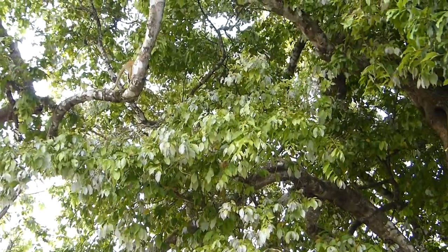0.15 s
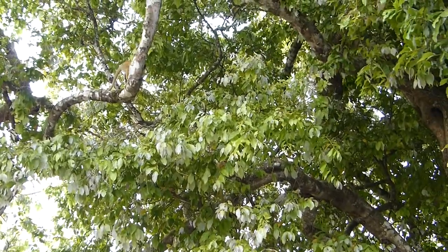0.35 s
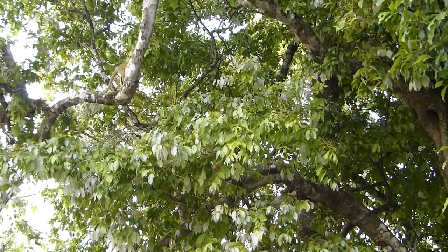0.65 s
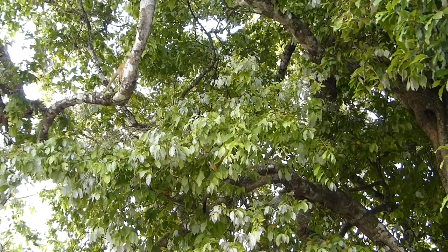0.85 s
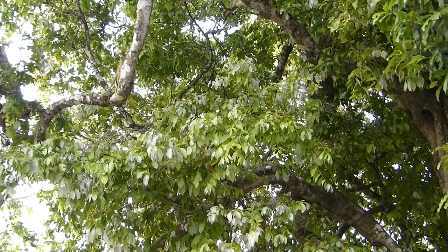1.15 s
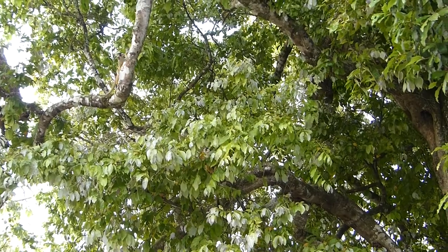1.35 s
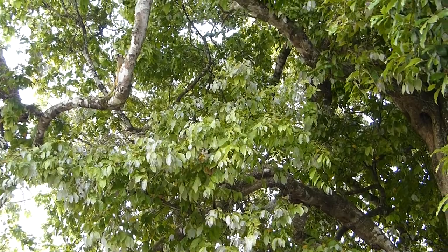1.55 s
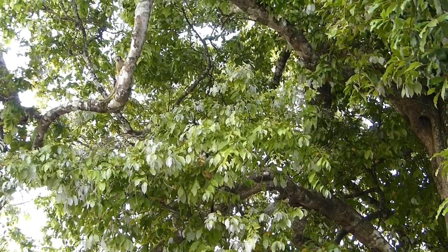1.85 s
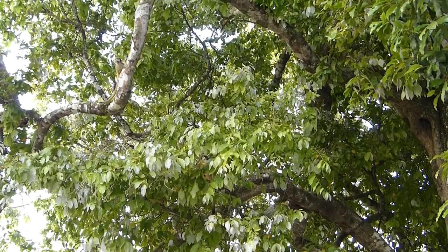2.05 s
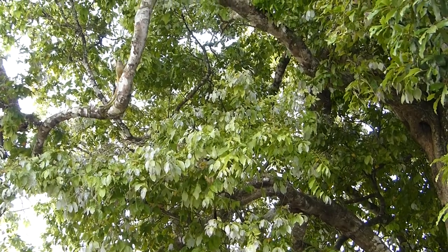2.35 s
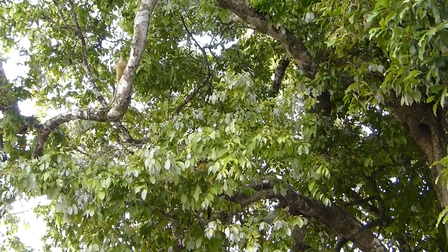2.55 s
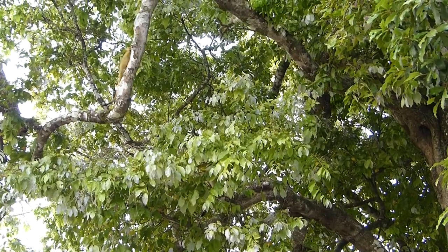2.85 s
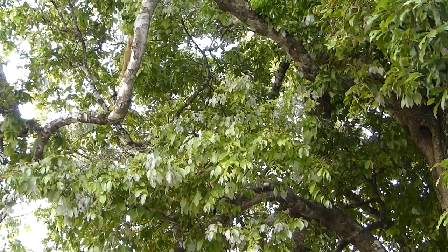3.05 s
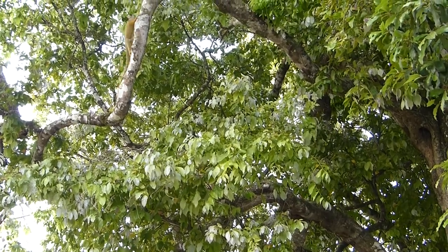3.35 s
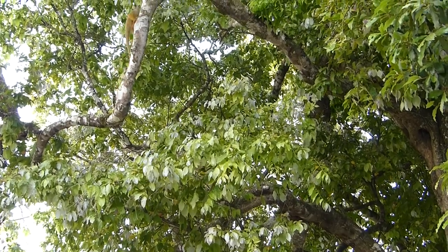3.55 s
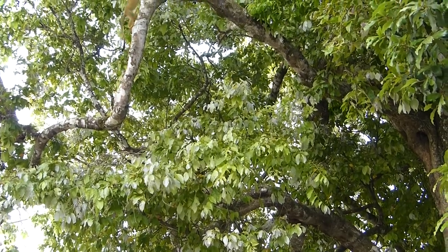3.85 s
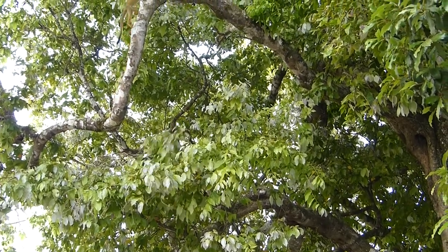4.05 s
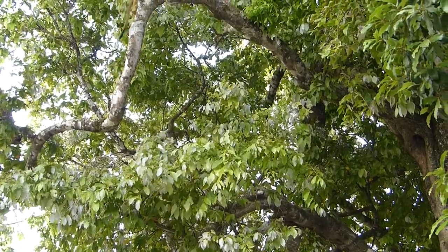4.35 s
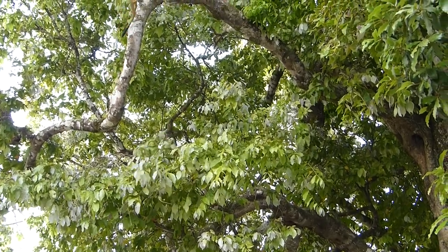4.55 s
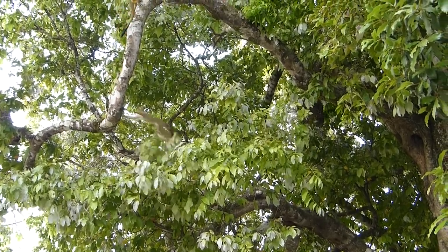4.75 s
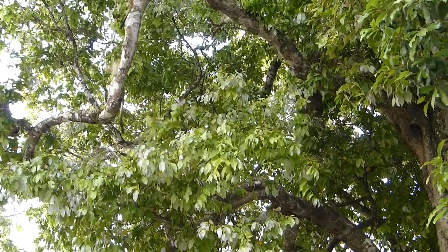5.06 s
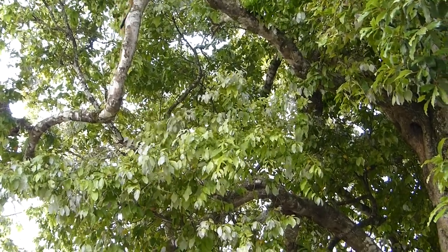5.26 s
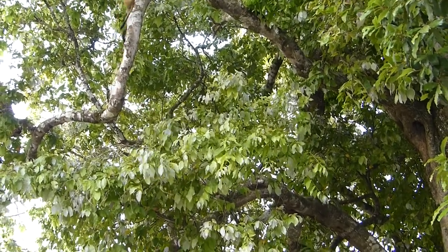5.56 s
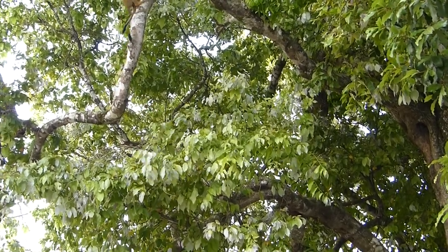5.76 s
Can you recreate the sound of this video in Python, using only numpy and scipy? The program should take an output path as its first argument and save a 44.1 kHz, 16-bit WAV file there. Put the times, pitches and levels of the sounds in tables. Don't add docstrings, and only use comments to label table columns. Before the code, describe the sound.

Small monkeys give bright, high peeps and chirps in a leafy tree, growing to a loud squealing flurry with branch thuds and leaf rustles.

```python
import sys
import numpy as np
from scipy import signal
from scipy.io import wavfile
from scipy.ndimage import uniform_filter1d

SR = 44100
rng = np.random.default_rng(int(sys.argv[2]) if len(sys.argv) > 2 else 0)


def linear_from_db(decibels):
    return 10 ** (np.asarray(decibels, float) / 20)


def unload_wav(signal):
    wavfile.write(
        sys.argv[1],
        SR,
        np.round(np.clip(np.atleast_2d(signal).T, -1, 1) * 32767).astype(np.int16),
    )


N = 259749


# share_of_hold, share_of_rise, level_db
PEEP_HOLD = [(0, 0.025, -1.9), (.5, 0.36, -1.5), (0.998, 0.96, 0.2)]
# share_of_flick, share_of_rise, level_db
PEEP_FLICK = [(.5, 0.46, -0.5), (1, 1, -9)]


def peep(s, hold_s, start_hz, held_hz, level_db):
    top_hz = 11324 + 78 * (level_db + 22)
    flick_hz = top_hz - held_hz
    flick_s = flick_hz / 127000
    hold_rise_hz = held_hz - start_hz
    onset_db = -0.1369 * min(hold_rise_hz / hold_s / 1000, 27)
    hold = [(s + u * hold_s, start_hz + rise * hold_rise_hz, level_db + db + onset_db * (1 - u))
            for u, rise, db in PEEP_HOLD]
    flick = [(s + hold_s + u * flick_s, held_hz + rise * flick_hz, level_db + db)
             for u, rise, db in PEEP_FLICK]
    return hold + flick


# pitch_hz, octave_db (over the pitch)
OCTAVE = [(5100, 11), (5700, -9), (6400, -16), (7100, -25), (7700, -23.5), (8300, -40.5)]


def with_octave(rows):
    s, hz, level_db = np.transpose(list(rows))
    progress = (s - s[0]) / (s[-1] - s[0])
    climb_khz_s = np.maximum(np.gradient(hz, s), 0) / 1000 * progress
    return np.transpose([s, hz, level_db, at_hz(OCTAVE, hz) - 0.12 * climb_khz_s])


def sweep(s, length_s, start_hz, top_hz, peak_db, levels):
    u = np.linspace(0, 1, num=24)
    straight_share, bend_power = 0.4, 4.6
    rise = straight_share * u + (1 - straight_share) * u ** bend_power
    hz = start_hz + (top_hz - start_hz) * rise
    level_db = peak_db + np.interp(u, *np.transpose(levels))
    return with_octave(zip(s + length_s * u, hz, level_db))


def whistle(rows):
    s, hz, level_db, *more = np.transpose(rows)
    t = np.arange(s[0], s[-1], 1 / SR)
    hz = uniform_filter1d(np.interp(t, s, hz), size=330, mode="nearest")
    turn = 2 * np.pi * np.cumsum(hz) / SR
    tone = np.sin(turn)
    for octave_db in more:
        octave = linear_from_db(np.interp(t, s, octave_db))
        tone += octave * np.sin(2 * turn) * (hz < 9000)
        third = octave * linear_from_db(-25.5)
        tone += third * np.sin(3 * turn) * np.clip((5150 - hz) / 200, 0, 1)
    flutter = rms_one(np.convolve(rng.standard_normal(SR // 2), np.hanning(260)))[260:260 + len(t)]
    tone *= 1 + 0.33 * np.clip((5300 - hz) / 200, 0, 1) * flutter
    attack_s, release_s = 0.0048, 0.0028
    edge = np.clip(np.minimum((t - s[0]) / attack_s, (s[-1] - t) / release_s), 0, 1)
    return np.sqrt(2) * linear_from_db(np.interp(t, s, level_db)) * tone * np.sin(edge * np.pi / 2) ** 2


def rasp(tone, share):
    low = signal.butter(4, 260, fs=SR, output="sos")
    flutter = signal.sosfilt(low, rng.standard_normal(len(tone)))
    return tone * (np.sqrt(1 - share ** 2) + share * rms_one(flutter))


# pitch_hz, t60_s
TREES_T60 = [(2500, 0.29), (5000, 0.44), (8000, 0.41), (11000, 0.29), (15000, .3)]


def trees(hz, hidden_db):
    t = np.arange(SR // 2) / SR
    echo_s = 0.013 + 0.011 * rng.uniform(-2.25, 1)
    glints = linear_from_db(2.8 * np.minimum(rng.exponential(1, len(t)), 3))
    grains = rng.standard_normal((2, len(t))) * glints
    crown = np.exp(-.5 * ((t - echo_s) / 0.011) ** 2)
    scatter = np.clip((t - .004) / 0.0075, 0, 1) * linear_from_db(-60 * t / at_hz(TREES_T60, hz))
    near = np.exp(-t / 0.0016)
    shape = linear_from_db(-13.5) * crown / np.linalg.norm(crown)
    shape += linear_from_db(-4) * scatter / np.linalg.norm(scatter)
    shape += linear_from_db(-9) * near / np.linalg.norm(near)
    path = pair(*rms_one(grains), alike=0.79) * np.sqrt(2) * linear_from_db(hidden_db) * shape
    shade_hz, shade_gain = 12360, linear_from_db(-17.5)
    direct = 1. * (t == 0)
    dull = signal.sosfilt(signal.butter(2, shade_hz, fs=SR, output="sos"), direct + 1e-18)
    return path + shade_gain * direct + (1 - shade_gain) * dull


# start_s, hold_s, start_hz, held_hz, level_db
PEEPS = [
    (0.522, 0.048, 7870, 9160, -31.5),
    (1.236, 0.048, 8370, 9450, -22),
    (1.493, 0.059, 8325, 9220, -24),
    (1.749, 0.06, 8250, 8910, -22.5),
    (2.556, 0.046, 8540, 9340, -23.5),
    (2.806, 0.055, 7970, 9300, -28.5),
    (3.3, 0.063, 8610, 9300, -32),
]
# start_s, length_s, start_hz, top_hz, peak_db
SWEEPS = [
    (1.211, .022, 6370, 8480, -56),
    (2.522, 0.04, 5820, 7070, -54),
    (3.286, 0.0264, 6120, 7360, -50.5),
    (3.836, 0.015, 7780, 9300, -36.5),
    (4.589, 0.05, 6910, 12200, -21.5),
    (5.176, 0.077, 5510, 13420, -12.5),
    (5.385, 0.071, 5090, 11140, -18.5),
    (5.652, 0.021, 7900, 9600, -31),
]
# share_of_length, level_db
SWEEP_LEVEL = [(0, -13.5), (.35, -7.5), (.77, 0), (.88, -7), (1, -11)]
SWEEP_OCTAVE_DB = [-20, -20, -20, -11, 2, 5, 3, -7.5]
# start_s, length_s, start_hz, top_hz, peak_db
SNAPS = [
    (.906, .026, 7640, 10220, -31.5),
    (4.798, .042, 7010, 12870, -18),
]
# share_of_length, level_db
SNAP_LEVEL = [(0, -3), (.37, -4), (.7, -1), (1, -7.5)]
SNAP_OCTAVE_DB = [-20, 0]
# time_s, pitch_hz, level_db
TWITTERS = [
    [(3.508, 5800, -43), (3.516, 6710, -33.5), (3.535, 8160, -25), (3.57, 8640, -28.5),
     (3.592, 8900, -28.5), (3.612, 9170, -27.5), (3.622, 9800, -31), (3.631, 10540, -36)],
    [(4.0, 8520, -24), (4.04, 9085, -28.5), (4.08, 9314, -27.5), (4.125, 9150, -34), (4.133, 9470, -21.5),
     (4.139, 11030, -25.5), (4.146, 11200, -34)],
    [(4.249, 7720, -31), (4.262, 8500, -29.5), (4.285, 9020, -26.5), (4.33, 9345, -25), (4.37, 9040, -24.5),
     (4.41, 7790, -24), (4.445, 6230, -23), (4.475, 5893, -21.5), (4.49, 7410, -23.5), (4.503, 9220, -26)],
    [(4.973, 6610, -24), (5.0, 7420, -26), (5.02, 8380, -23), (5.043, 12000, -31.5)],
    [(5.425, 8970, -34), (5.48, 9200, -37), (5.52, 9460, -37.5), (5.54, 9780, -34.5), (5.555, 11740, -37.5)],
    [(5.672, 8980, -23), (5.71, 9110, -25), (5.76, 9520, -25.5), (5.79, 9400, -19.5), (5.82, 8120, -19),
     (5.845, 6910, -22.5), (5.853, 7000, -20), (5.874, 10390, -19.5)],
]
TWITTER_OCTAVE_DB = [8, -6, -0.5, -1.5, -3, 2.5]
# time_s, pitch_hz, level_db, octave_db (over the pitch)
SQUEAKS = [
    [(1.702, 4430, -49, -40), (1.712, 5000, -46.5, -40), (1.72, 5370, -47.5, -40), (1.73, 5460, -62, -40)],
    [(4.657, 5000, -29, -12), (4.672, 4638, -28.5, 0.5), (4.7, 4484, -28, 4), (4.72, 4743, -23.5, -8),
     (4.732, 4970, -20.5, -12), (4.738, 5800, -29, -46), (4.746, 7500, -27.5, -45), (4.754, 8350, -26, -45)],
    [(4.955, 2533, -46.5, 16), (4.97, 2468, -43, 4.5), (5.015, 2454, -45, -8)],
    [(4.996, 4000, -39, -24), (5.01, 4130, -41, -27), (5.045, 4230, -53, -14)],
    [(5.003, 4500, -33, -28), (5.025, 4730, -26, -30), (5.05, 4900, -29.5, -30), (5.09, 4900, -43, -30)],
    [(5.205, 5100, -42, 8), (5.222, 5080, -38, -2), (5.233, 5116, -31, -28), (5.262, 5150, -32, -30)],
]
SQUEAK_RASP = [.2, 0, 0, .3, .5, .35]
HIDDEN_DB = [
    [-2, -4.5, -3.5, -4, -4.5, 1, 2],
    [6.5, 6, 7, 1.5, 0.6, -6.5, -2.5, 1.5],
    [1.1, -2],
    [0, -1.4, .6, 2.5, 6.5, -1.5],
    [2, -0.3, -8, 0, 2, -1],
]


def monkeys():
    calls = [peep(*row) for row in PEEPS]
    calls += [sweep(*row, SWEEP_LEVEL) + [0, 0, 0, db] for row, db in zip(SWEEPS, SWEEP_OCTAVE_DB)]
    calls += [sweep(*row, SNAP_LEVEL) + [0, 0, 0, db] for row, db in zip(SNAPS, SNAP_OCTAVE_DB)]
    calls += [with_octave(rows) + [0, 0, 0, db] for rows, db in zip(TWITTERS, TWITTER_OCTAVE_DB)]
    rasps = [0] * len(calls) + list(SQUEAK_RASP)
    out = np.zeros((2, N + SR))
    for rows, share, hidden_db in zip(calls + list(SQUEAKS), rasps, np.concatenate(HIDDEN_DB)):
        voice = rasp(whistle(rows), share)
        mean_hz = np.mean(rows, axis=0)[1]
        heard = signal.fftconvolve(voice[None], trees(mean_hz, hidden_db), axes=1)
        at = int(rows[0][0] * SR)
        out[:, at:at + heard.shape[1]] += heard
    return linear_from_db(-1.0) * out[:, :N]


# time_s, centre_hz, level_db
SCREECH = [(4.95, 5950, -65), (4.965, 5985, -35), (5.0, 5535, -30.5), (5.05, 5640, -26), (5.1, 5900, -37.5),
           (5.17, 5970, -44), (5.25, 5800, -72)]


def screech():
    t = np.arange(N) / SR
    hz, level_db = in_time(SCREECH)
    sounds = (t > SCREECH[0][0]) & (t < SCREECH[-1][0])
    return sounds * linear_from_db(level_db) * narrow_noise(hz, width_hz=1500)


# time_s, wood_db, leaves_db, limb_db
SHAKES = [(.43, -74, -71, -53), (1.0, -57.5, -88, -59), (1.33, -60, -68, -72), (1.44, -58.5, -87, -70),
          (1.64, -54.5, -66, -85), (1.97, -60, -67, -64), (2.53, -62, -65, -57), (2.74, -60, -83, -76),
          (3.46, -60, -61.5, -53.5), (3.8, -70, -70, -48), (3.87, -66, -89, -58), (3.99, -59, -72, -52),
          (4.07, -54, -81, -69), (4.28, -56, -57.5, -45), (4.36, -52, -62, -65), (4.429, -57, -64.5, -44.5),
          (4.79, -50, -68, -42), (4.83, -49.5, -52.5, -60), (4.908, -49.5, -49.5, -44.5),
          (5.001, -70, -47.5, -75), (5.06, -42.5, -58, -40.5), (5.1, -44.5, -54.5, -42.5),
          (5.38, -50.5, -77, -76), (5.82, -75, -78, -60)]


def shakes(column):
    t = np.arange(0, N + 64, 64) / SR
    power = 0
    for row in SHAKES:
        rise_db, fall_db = 213 * (row[0] - t), 144 * (t - row[0])
        power = power + linear_from_db(row[column] - np.maximum(rise_db, fall_db)) ** 2
    return np.interp(np.arange(N) / SR, t, np.sqrt(power))


# time_s, wood_db, leaves_db, t60_s
LANDINGS = [
    (1.93, -56, -59, 0.26),
    (2.45, -55, -62, 0.35),
    (2.904, -50, -53, 0.16),
    (4.79, -71, -76, .3),
    (4.957, -62, -47, 0.51),
    (5.031, -39, -60, 0.52),
]


def landings(column):
    t = np.arange(N) / SR
    return sum((t > row[0]) * linear_from_db(row[column] - 60 * np.maximum(t - row[0], 0) / row[3])
               for row in LANDINGS)


# time_s, level_db
BUSTLE = [(0, -70.5), (1.2, -78), (2.2, -70), (2.55, -69), (3.7, -67), (4.3, -61), (4.95, -66.5),
          (5.4, -64), (5.89, -76)]
# pitch_hz, density_db (per Hz)
WOOD = [(47, -47), (80, -31), (276, -20.5), (431, -15), (543, -8), (714, -8.5), (861, -17.5), (1370, -16.5),
        (2500, -33.5), (3250, -55), (5500, -120)]
# pitch_hz, density_db (per Hz)
LEAVES = [(1200, -28), (2000, 2), (3200, 2), (5000, 4), (8000, 2), (12000, -8.5), (16000, -48)]


def branches():
    bustle_db, = in_time(BUSTLE)
    wood_bed = linear_from_db(-61.5 + 0.27 * (bustle_db + 73.5))
    wood_gain = np.hypot(wood_bed, shakes(column=1)) + landings(column=1)
    wood = wood_gain * banded(rng.standard_normal((2, 2, N)), WOOD, patchy_db=-2.0)
    limb = linear_from_db(-5.5) * shakes(column=3) * narrow_noise(hz=1259, width_hz=192)
    grains = rng.standard_normal((2, 2, N)) * linear_from_db(1.9 * np.minimum(rng.exponential(1, N), 5))
    leaves_gain = linear_from_db(8.0) * np.hypot(linear_from_db(bustle_db), shakes(column=2)) + landings(column=2)
    leaves = leaves_gain * banded(grains, LEAVES, patchy_db=2.0)
    return wood + limb + leaves


# from_s, to_s, centre_hz, width_hz, level_db
INSECTS = [(-1, 0.38, 5021, 200, -64.5), (-0.95, 0.99, 5271, 121, -60.6), (1, 2.14, 5281, 126, -61),
           (0.37, 1.34, 5001, 481, -63.1), (1.29, 2.14, 5101, 381, -63.6), (2.0, 7.0, 5121, 520, -66),
           (4, 5.44, 5102, 431, -59.1), (5.5, 7.0, 5201, 401, -60), (2.11, 2.46, 5251, 251, -66.5),
           (-0.6, 7.0, 6151, 310, -66.5), (-1, 0.54, 8151, 131, -70), (-1.0, .31, 9300, 301, -70.1),
           (1.5, 7.0, 8620, 160, -71)]


def insects():
    out = 0
    for from_s, to_s, hz, width_hz, db in INSECTS:
        throb = linear_from_db(db + 0.31 * drift(8.4))
        out = out + gate(from_s, to_s, fade_s=0.073) * throb * narrow_noise(hz, width_hz)
    return out


# start_s, length_s, pitch_hz, glide_hz, level_db
BIRD = [
    (5.171, 0.19, 1730, -20.5, -61),
    (5.46, .2, 1770, -60.5, -60),
    (5.67, 0.22, 1784, 20.5, -60.5),
]


def bird():
    t, hz, gain = np.arange(N) / SR, np.full(N, float(BIRD[0][2])), 0
    for s, length_s, note_hz, glide_hz, db in BIRD:
        glide = note_hz + glide_hz * np.clip((t - s) / length_s, 0, 1)
        hz = np.where(t > s - .02, glide, hz)
        fade_db = 10 * np.clip(t - s, 0, 1)
        gain = gain + gate(s, s + length_s, fade_s=0.06) * linear_from_db(db - fade_db)
    return gain * narrow_noise(hz, width_hz=38)


# pitch_hz, density_db (per Hz)
AIR = [(12, -42), (20, -19), (194, -4), (337, 3), (398, -1.5), (457, 7), (555, -13.5), (656, 3), (796, 2.5),
       (1170, -3), (3360, -16), (5090, -14), (5690, -13), (8380, -11), (15000, -28.5)]
# pitch_hz, width_hz, level_db
HUM = [
    (476, 37, -66),
    (703.4, 94, -60.5),
]


def forest():
    air = linear_from_db(-55.5) * banded(rng.standard_normal((2, 2, N)), AIR, patchy_db=2.0)
    air = signal.sosfilt(signal.butter(8, 14700, fs=SR, output="sos"), air)
    return air + sum(linear_from_db(db + 2.3 * drift(9.2)) * narrow_noise(hz, width_hz) for hz, width_hz, db in HUM)


# pitch_hz, likeness (left to right, -1 to 1)
LIKENESS = [(60, 0.69), (130, 0.46), (290, -0.52), (640, -0.67), (1410, 0.32), (3100, 0.49), (6820, 0.8),
            (15000, 0.37)]


def banded(white, spectrum, patchy_db):
    out, together = 0, drift(3.0)
    edges = 20 * 2 ** np.arange(0, 9.8, .4)
    for k, (low, high) in enumerate(zip(edges, edges[1:])):
        hz = np.sqrt(low * high)
        if at_hz(spectrum, hz) > -55:
            band = signal.butter(2, [low, high], "band", fs=SR, output="sos")
            mid, side = signal.sosfilt(band, white[k % 2])
            gain = linear_from_db(at_hz(spectrum, hz) + patchy_db * (0.47 * together + drift(8.8)))
            out = out + gain * pair(mid, side, at_hz(LIKENESS, hz))
    return rms_one(out)


def narrow_noise(hz, width_hz):
    low = signal.butter(2, width_hz / 2, fs=SR, output="sos")
    a, b = signal.sosfilt(low, rng.standard_normal((2, 2, N)))
    turn = 2 * np.pi * np.cumsum(hz * np.ones(N)) / SR
    mid, side = a * np.cos(turn) + b * np.sin(turn)
    return rms_one(pair(mid, side, at_hz(LIKENESS, np.mean(hz))))


def pair(mid, side, alike):
    alike = np.clip(alike, -1, 1)
    return np.sqrt((1 + alike) / 2) * mid + np.sqrt((1 - alike) / 2) * side * [[1], [-1]]


def drift(rate):
    r = np.exp(-80 * np.pi * rate / SR)
    slow = signal.lfilter([1], [1, -2 * r, r * r], rng.standard_normal(N // 40 + 2002))[2000:]
    return np.interp(np.arange(N) / 40, np.arange(len(slow)), rms_one(slow))


def gate(from_s, to_s, fade_s):
    t = np.arange(N) / SR
    return np.clip(np.minimum(t - from_s, to_s - t) / fade_s + .5, 0, 1)


def in_time(rows):
    s, *columns = np.transpose(rows)
    return [np.interp(np.arange(N) / SR, s, c) for c in columns]


def at_hz(points, hz):
    points = np.array(points)
    return np.interp(np.log(hz), np.log(points[:, 0]), points[:, 1])


def rms_one(x):
    return x / np.sqrt(np.mean(x ** 2) + 1e-20)


def scene():
    return monkeys() + screech() + branches() + insects() + bird() + forest()


def starve(x):
    from_hz, quiet_db = 9300, -48.5
    hz, _, z = signal.stft(x, SR, nperseg=1024)
    hz = hz[:512, None]
    power = np.mean(np.abs(z) ** 2, axis=0) * 2 / 1.5
    power = uniform_filter1d(power, size=2, origin=0, axis=1)
    band_power = power[:512].reshape(32, 16, -1).sum(1)
    band_db = 10 * np.log10(np.repeat(band_power, 16, axis=0) + 1e-18)
    whole_db = 10 * np.log10(power.sum(0) + 1e-18)
    tilt_db = 1.3 * (hz // 689 * 689 - from_hz) / 1000
    limit_db = np.minimum(whole_db - 28.5 - tilt_db, -60)
    quiet = quiet_db - whole_db - 30 * (hz > 14900)
    kept = np.clip(np.maximum(band_db - limit_db, quiet), 0, 1)
    z[:, :512] *= np.where(hz > from_hz, kept, 1)
    return signal.istft(z, SR, nperseg=1024)[1][:, :N]


def top_cut(x):
    return signal.sosfilt(signal.butter(12, 15830, fs=SR, output="sos"), x)


def record(dry):
    balance_db = np.array([[.1], [-.1]])
    mix = starve(dry * linear_from_db(balance_db))
    return top_cut(mix)


dry = scene()
out = record(dry)
unload_wav(out)
```